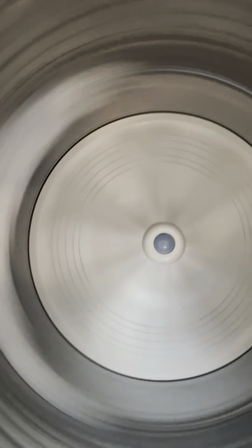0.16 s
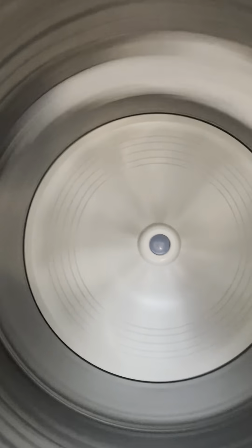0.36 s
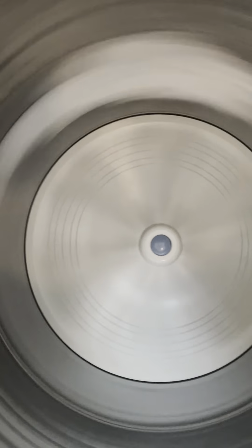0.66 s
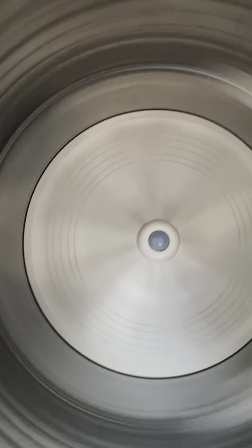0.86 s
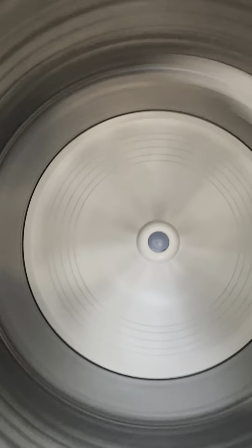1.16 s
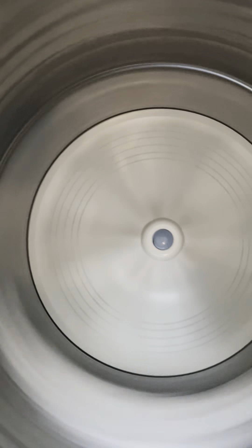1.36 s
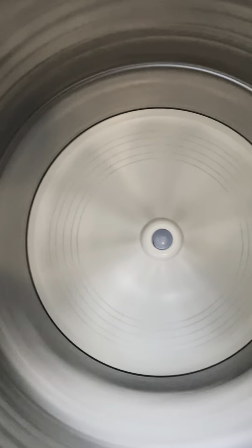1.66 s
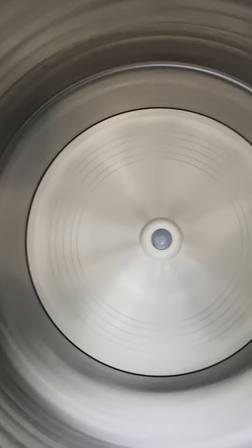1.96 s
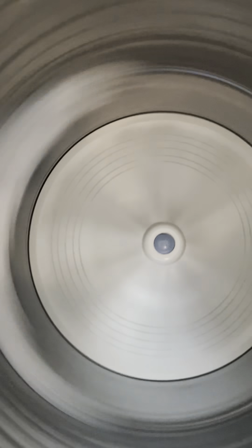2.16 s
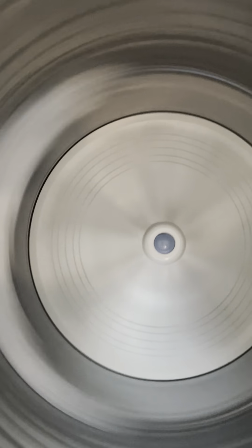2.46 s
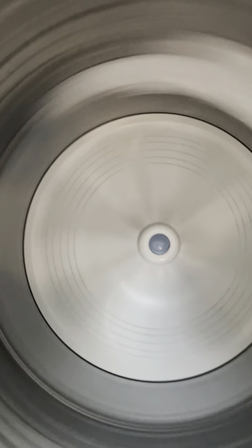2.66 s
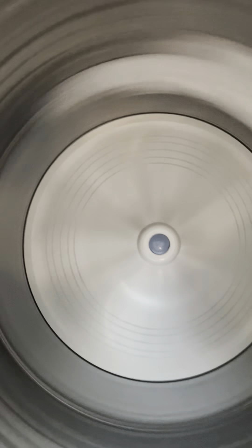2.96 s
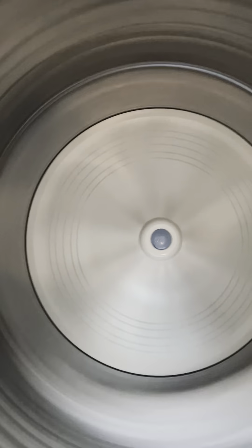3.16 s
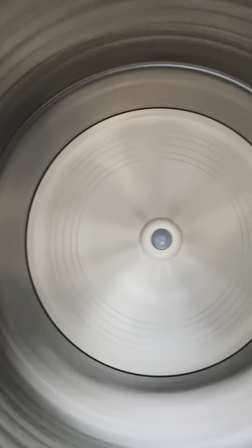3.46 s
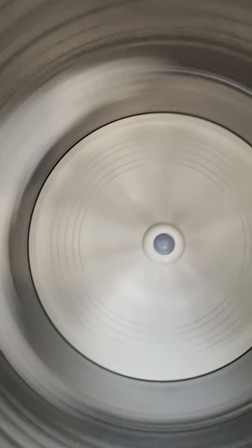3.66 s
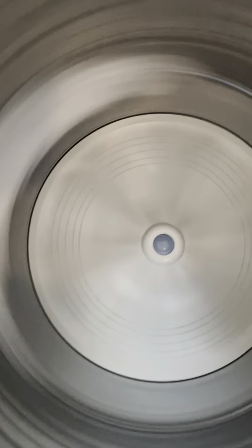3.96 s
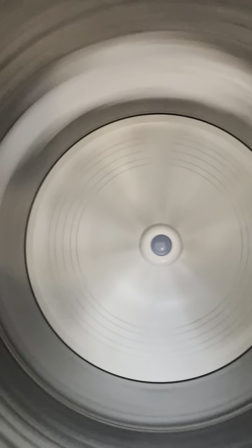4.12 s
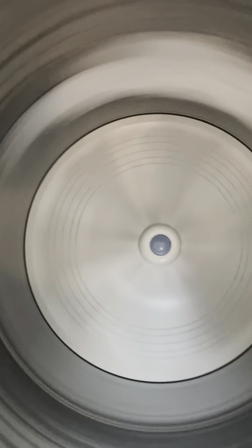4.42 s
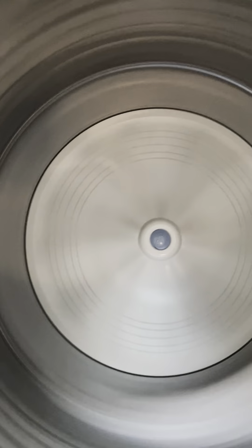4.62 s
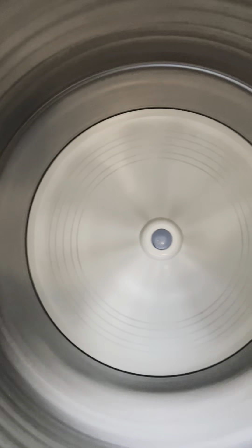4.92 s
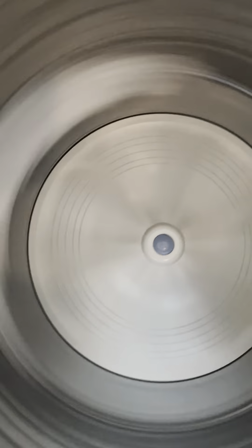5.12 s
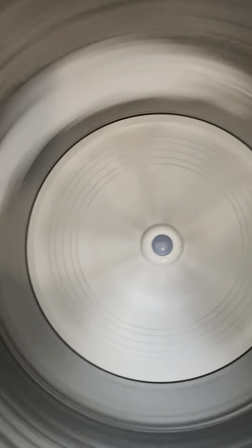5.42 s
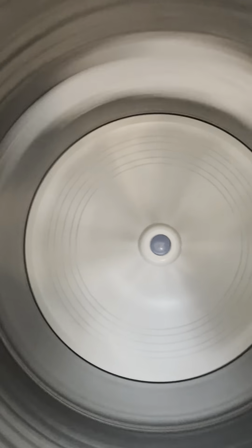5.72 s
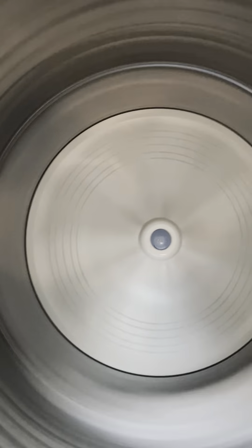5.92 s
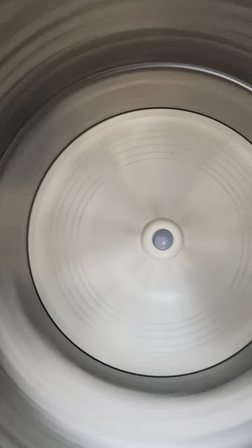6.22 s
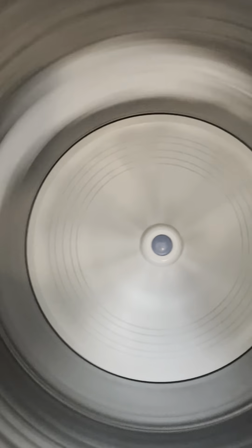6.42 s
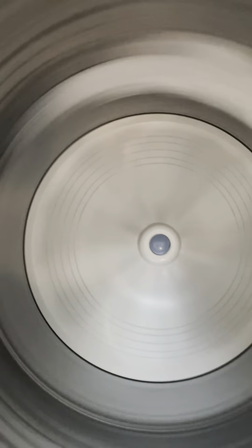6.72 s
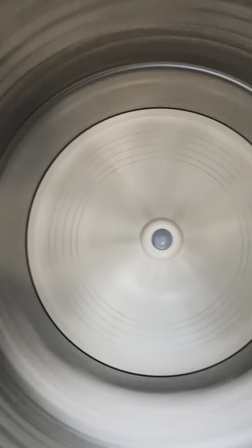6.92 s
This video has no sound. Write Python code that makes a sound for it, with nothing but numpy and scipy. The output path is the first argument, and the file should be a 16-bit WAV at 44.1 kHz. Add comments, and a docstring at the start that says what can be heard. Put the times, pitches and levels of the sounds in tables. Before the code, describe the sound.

A washing machine in its spin cycle, heard from just above the open steel drum indoors. A loud low mains hum dominates, dipping irregularly about twice a second while a deeper shake throbs rapidly underneath. A steady mid-pitched motor whine, uneven tub rumble, metallic whirr and rushing air continue throughout, with occasional dull panel booms and faint high scuffs.

```python
"""A mains hum runs throughout, with a brief thin high hiss at the start: a top-loading washing machine spins,
slowly gaining speed, with the microphone held over its open steel drum. The induction motor hums on
multiples of the mains; in each surge of load the hum sags and a deep shake throbs once per drum turn.
The tub rumbles unevenly, the drive whirrs through drum resonances, and shaped noise makes air rushing past
the perforated wall. Panels rumble and boom as short tones; brief high noise makes the drum's scuffs."""
import sys
import numpy as np
from scipy import signal
from scipy.fft import rfft, irfft, next_fast_len
from scipy.io import wavfile
from scipy.ndimage import uniform_filter1d, map_coordinates

SR = 44100
rng = np.random.default_rng(int(sys.argv[2]) if len(sys.argv) > 2 else 0)


def wav_out(sig):
    """Save sig, one row per channel (or a flat mono array), as 16-bit PCM at SR to the path in sys.argv[1]."""
    wavfile.write(sys.argv[1], SR, np.round(np.clip(np.atleast_2d(sig).T, -1, 1) * 32767).astype(np.int16))


N = 312228
TIME = np.arange(N) / SR  # s
MAINS_HZ = 59.98


def amp(db):
    """Level and amplitude: decibels become a linear gain."""
    return 10 ** (np.asarray(db) / 20)


def unit(x):
    """Normalisation by energy: x scaled to rms 1."""
    return x / np.sqrt(np.mean(np.abs(x) ** 2) + 1e-20)


def along(points, hz):
    """Logarithmic pitch scale: (frequency [Hz], value) points interpolated at hz."""
    f, value = np.transpose(points)
    return np.interp(np.log(hz + 1), np.log(f + 1), value)


def curve(rows):
    """Linear interpolation: (time [s], value) rows as one value per sample."""
    return np.interp(TIME, *np.transpose(rows))


def drift(rate):
    """Slow random modulation: a smooth curve through random knots, rate of them a second."""
    coarse = np.linspace(0, N / SR, N // 64)
    knots = rng.standard_normal(int(N * rate / SR) + 4)
    return np.interp(TIME, coarse, map_coordinates(knots, [coarse * rate]))


def filtered(x, response):
    """Linear filtering: the spectrum of x times a response of frequency."""
    size = next_fast_len(N + SR // 2)
    return irfft(rfft(x, size) * response(np.fft.rfftfreq(size, 1 / SR)), size)[..., :N]


def swell(s, length):
    """Gaussian envelope: a rise to 1 at time s and a fall; length [s] is its half length."""
    out = np.zeros(N)
    near = slice(*np.searchsorted(TIME, [s - np.pi * length, s + np.pi * length]))
    out[near] = np.exp(-((TIME[near] - s) / length) ** 2)
    return out


def swells(rows, lead=0):
    """Level changes add in dB: (time [s], half length [s], change [dB]) rows, lead seconds ahead."""
    return sum(db * swell(s - lead, length) for s, length, db in rows)


def ringing(modes, f):
    """Modal superposition: complex gain at f of (centre [Hz], width [Hz], level [dB]) resonances."""
    gain = 0
    for k, (hz, width, db) in enumerate(modes):
        damping = 1j * f * width
        gain = gain + (-1) ** k * amp(db) * damping / (hz * hz - f * f + damping)
    return gain


def standing_waves(hz, ripple_db, life=0.02):
    """Comb-like interference: decaying echoes in the drum (life [s]) leave a steady ripple in a spectrum."""
    t = np.arange(SR // 10) / SR
    echoes = rng.standard_normal(len(t)) * np.exp(-t / life) * (t > .004)
    ripple = unit(rfft(echoes, SR).real)  # one bin per Hz
    return amp(ripple_db * np.interp(hz, np.arange(len(ripple)), ripple))


# the spaced microphone ports hear the sound at slightly different times:
# (frequency [Hz], phase lead of the left port [rad])
PORT_LEAD = [(130, 0), (260, -.4), (600, -.75), (860, -1.2), (1290, 0), (1750, 0), (2580, 2.6), (3700, 1.7),
             (4500, 1.8), (5000, 1.3), (5900, 3.1), (7700, 6), (10300, 9.4), (12500, 12.5)]
# level difference of the ports: (frequency [Hz], left minus right [dB])
PORT_BALANCE = [(120, 0.5), (480, -1.5), (900, 2), (1400, -1.5), (2000, 0.5), (2800, -1.5), (4600, -3),
                (5800, -1)]


def ports(hz):
    """Differences of level and phase at spaced ports: complex gain of the left and right one."""
    half = np.array([[.5], [-.5]])
    return amp(half * along(PORT_BALANCE, hz)) * np.exp(1j * half * along(PORT_LEAD, hz))


# likeness of the noise at the two ports: (frequency [Hz], likeness [0-1])
PORT_LIKENESS = [(120, 0.97), (250, 0.68), (480, .92), (650, 0.2), (900, .2), (1300, 0.36), (1750, 0.86),
                 (4800, 0.9), (5900, 1), (7200, 1)]


def noise(colour):
    """Partly coherent sound field: noise at both ports, colour(hz) its amplitude per root Hz."""
    hz = np.fft.rfftfreq(next_fast_len(N + SR // 2, real=True), 1 / SR)
    size = 2 * (len(hz) - 1)
    spread = np.arccos(np.clip(along(PORT_LIKENESS, hz), 0, 1)) / 2
    white = rfft(rng.standard_normal((2, N)) * np.sqrt(SR / 2), size)
    common, apart = white * colour(hz) * np.array([np.cos(spread), np.sin(spread)])
    return irfft(np.array([common + apart, common - apart]) * ports(hz), size)[:, :N]


def tone(hz, envelope):
    """Complex phasor: a line at both ports whose envelope holds rms level and phase."""
    angle = 2 * np.pi * (hz * TIME + rng.random())
    return np.sqrt(2) * np.real(ports(hz) * envelope * np.exp(1j * angle))


START_TURN = .35  # the drum's position at the start, turns
# speed of the drum: (time [s], speed [turns per second])
DRUM_SPEED = [(0, 6.415), (7.08, 7.08)]


def drum_turning():
    """Rotation kinematics: the drum's angle [rad] is its speed summed over time."""
    return 2 * np.pi * (START_TURN + np.cumsum(curve(DRUM_SPEED)) / SR)


# surges of load on the motor: (time [s], half length [s], sag of the hum [dB])
LOAD_SURGES = [(0.14, 0.23, 5.5), (0.448, 0.11, 7.5), (0.94, 0.15, 4.5), (1.33, 0.12, 14),
               (1.538, 0.074, 13.5), (1.8, .13, 1), (2.09, 0.16, 14.5), (2.63, 0.15, 6),
               (3.045, 0.14, 18.5), (3.78, 0.25, 3.5), (4.13, 0.07, 3.5), (4.791, 0.12, 13.5),
               (5.19, 0.19, 8.0), (5.563, 0.08, 5), (5.872, 0.085, 12), (6.07, 0.12, 10.5), (6.43, 0.14, 7),
               (6.76, 0.14, 18.5)]


def sag(lead=0):
    """Loading of a motor: the dB that surges take from the hum, lead seconds ahead."""
    return swells(LOAD_SURGES, lead)


def strain():
    """Load about its mean: the sag above its average, in dB."""
    db = sag()
    return db - db.mean()


HUM_DB = -18  # magnetic hum at twice the mains, between surges
# shake at the mains frequency, before its swells: between surges, and added by a full surge
SHAKE_REST_DB, SHAKE_SURGE_DB = -37, -22
SHAKE_LEAD_S = 0.026  # the shake comes this much before the sag of the hum
# the deep shake swells and ebbs: (time [s], half length [s], change [dB])
SHAKE_CHANGES = [(.94, .045, -15), (1.56, 0.028, -10), (3.02, .04, 0), (3.08, 0.03, -3), (3.5, .07, -12),
                 (4.0, 0.075, -13), (4.22, .1, 3.5), (4.42, 0.06, -6), (5.3, .15, 0.5), (5.68, .1, 3),
                 (6.15, .2, 2.5)]


def motor(drum_angle, beat_db=-47, beat_share=0.23, beat_lead=0.17, flutter=0.074, slip=0.46, steepness=1.11):
    """Magnetic hum and beating: surges shift the hum's phase; an off-centre drum beats the shake each turn."""
    lost_share = np.clip(1 - amp(-sag(SHAKE_LEAD_S)), 0, 1)
    shake = amp(SHAKE_REST_DB) + amp(SHAKE_SURGE_DB) * lost_share ** steepness
    # a line one drum speed above the mains beats with the shake; beat_lead and slip are in radians
    beat = (amp(beat_db) + beat_share * shake) * np.exp(1j * (drum_angle + beat_lead))
    unsteady = 1 + flutter * (drift(24) + 1j * drift(7.8))
    hum = amp(HUM_DB - sag()) * np.exp(1j * slip * lost_share) * unsteady
    deep = tone(MAINS_HZ, amp(swells(SHAKE_CHANGES)) * (shake + beat))
    return deep + tone(2 * MAINS_HZ, hum)


def hiss(hiss_db=-84, fade=0.089):
    """Exponential decay: a thin high hiss dies away in the first moments; fade [s] is its time constant."""
    # (frequency [Hz], density relative to hiss_db [dB])
    colour = [(4000, -34), (7500, -0.5), (9000, 3.0), (13000, -13), (14500, -28.5)]
    return amp(hiss_db) * np.exp(-TIME / fade) * noise(lambda hz: amp(along(colour, hz)))


THROB_TURN = 0.67  # point of each drum turn at which the upper tones peak, turns


def throb(drum_angle, depth):
    """Amplitude modulation: a gain of rms 1 that peaks once per drum turn."""
    return unit(1 + depth * np.cos(drum_angle - 2 * np.pi * THROB_TURN))


# overtones of the hum: (multiple of the mains, level at mean load [dB], unsteadiness [0-1],
# gain per dB of sag [dB], depth of the throb [0-1])
HUM_OVERTONES = [(3, -43, 0.5, 0.3, 0.4), (4, -33, 0.05, -0.05, 0.36), (5, -41, 0.4, -0.12, 0.2),
                 (6, -50, 0.6, -1.3, 0), (7, -42, 0.17, 0.02, 0.28), (10, -53, 0.55, -0.2, 0.02),
                 (15, -64, 0.4, -0.54, 0), (16, -66, 0.4, -1.1, 0.4)]
# single overtones sing out or fade: (multiple of the mains, time [s], half length [s], change [dB])
OVERTONE_SWELLS = [(5, 2.98, 0.15, 10), (5, 4.5, 0.054, 3.5), (5, 4.2, 0.074, 3.5), (5, 4.4, .22, 6),
                   (5, 5.3, .14, 5), (6, 5.5, .25, 9), (7, 0.33, .3, 3), (7, 1.56, 0.2, 7),
                   (7, 2.17, .11, 7), (7, 2.6, .11, 6), (7, 3.65, 0.31, -4), (7, 6.05, 0.073, 8),
                   (7, 6.88, .07, 5)]


def overtones(drum_angle, strain_db):
    """Harmonic series: upper lines waver and throb, load lifts or lowers each, and some sing out or fade."""
    out = np.zeros((2, N))
    for multiple, db, unsteady, grows, depth in HUM_OVERTONES:
        wandering = unit(drift(12) + 1j * drift(12))
        waver = np.sqrt(1 - unsteady ** 2) + unsteady * wandering
        singing_db = swells([row[1:] for row in OVERTONE_SWELLS if row[0] == multiple])
        level = amp(db + grows * strain_db + singing_db)
        out += tone(multiple * MAINS_HZ, level * waver * throb(drum_angle, depth))
    return out


WHINE_ORDER = 8  # multiple of the mains
# the motor's whine: (time [s], level before trim_db and throb [dB])
WHINE_LEVEL = [(0.15, -37), (0.4, -42), (0.62, -38), (1.1, -33), (1.5, -41), (1.75, -35.5), (1.95, -39),
               (2.35, -32.5), (2.8, -36.5), (3.7, -35.5), (4.1, -38), (4.6, -33), (4.8, -41), (4.98, -35),
               (5.27, -44), (5.6, -34.5), (5.8, -34), (6.08, -38.5), (6.3, -33.5), (6.52, -39),
               (6.8, -34.5), (7.0, -41.5)]


def whine(drum_angle, depth=.22, trim_db=-0.45):
    """A modulated harmonic: the motor's firm upper tone throbs with the drum and now and then fades."""
    level = amp(trim_db + curve(WHINE_LEVEL))
    return tone(WHINE_ORDER * MAINS_HZ, level * throb(drum_angle, depth))


# wobble of the drum: (multiple of its speed, rms level [dB])
DRUM_ORDERS = [(5, -59), (6, -55.5), (7, -55), (13, -49)]
# colour of the tub's rumble before jolts and ripple: (frequency [Hz], density [dB per Hz])
TUB_COLOUR = [(20, -90), (45, -73.5), (64, -48), (78, -56.5), (100, -60), (135, -58), (152, -52.5),
              (170, -59.5), (200, -59), (250, -57), (385, -61), (447, -64.5), (490, -59.5), (550, -69.5),
              (640, -72.5), (1500, -150)]


def tub(drum_angle, jolt_db=1, turn_db=0.86, ripple_db=1):
    """Random vibration plus rotational orders: the tub jostles on its springs over the drum's low orders."""
    jolts = amp(jolt_db * drift(15) + turn_db * np.cos(drum_angle))
    rumble = jolts * noise(lambda hz: amp(along(TUB_COLOUR, hz)) * standing_waves(hz, ripple_db))
    orders = 0
    for multiple, db in DRUM_ORDERS:
        orders = orders + amp(db) * np.sin(multiple * drum_angle + 2 * np.pi * rng.random())
    return rumble + np.sqrt(2) * orders


# resonances of the steel drum, before the soft roll-off: (centre [Hz], width [Hz], density [dB per Hz])
DRUM_MODES = [(1137, 14, -71), (1204, 17, -66), (1261.6, 16, -62), (1327, 50, -68.5), (1414, 33, -66),
              (1483, 22, -69.5), (2179, 15, -72.5), (2296, 40, -73), (2768, 85, -68), (2990, 21, -75.5),
              (3606, 52, -79), (4500, 150, -81.5), (4960, 40, -78.5), (5400, 48, -79)]
# the drive's own resonances, before the roll-off: (centre [Hz], width [Hz], density [dB per Hz])
DRIVE_MODES = [(1646, 50, -73), (1692, 36, -69.5), (1800, 67, -76)]
# the drive rubs harder for a moment: (time [s], half length [s], rise [dB])
DRIVE_RUBS = [(1.5, 0.057, 5), (2.96, .09, 7.5), (4.75, .06, 5), (6.58, .14, 4)]


def whirr(buzz=0.16, waver_db=1.04, soft_hz=5500, drive_waver_db=1.5):
    """Forced resonance: drive friction, pulsing with the motor's torque, rings steel drum and drive."""
    torque = unit(1 + buzz * np.cos(2 * np.pi * 2 * MAINS_HZ * TIME))

    def soft(hz):
        """Low-pass roll-off about soft_hz."""
        return 1 / (1 + (hz / soft_hz) ** 10)

    steel = noise(lambda hz: ringing(DRUM_MODES, hz) * soft(hz)) * amp(waver_db * drift(21))
    rubbing = amp(swells(DRIVE_RUBS) + drive_waver_db * drift(9))
    drive = noise(lambda hz: ringing(DRIVE_MODES, hz) * soft(hz)) * rubbing
    return (steel + drive) * torque


# colour of the rushing air before ripple and eddies: (frequency [Hz], density [dB per Hz])
AIR_COLOUR = [(300, -84.5), (620, -72.5), (900, -75.5), (1500, -72.5), (1950, -75.5), (2400, -70.5),
              (3050, -71.5), (3400, -80.5), (4400, -79), (4900, -85), (6200, -85.5), (7100, -99),
              (9300, -102), (15000, -122)]


def air(drum_angle, turn_db=0.4, patchy_db=1.36, ripple_db=2.0):
    """Turbulence noise: air swirls past the drum wall in eddies, a little stronger once a turn."""
    rush = noise(lambda hz: amp(along(AIR_COLOUR, hz)) * standing_waves(hz, ripple_db))
    bands = signal.stft(rush, nperseg=512)[2]
    # random patches, smoothed across frequency and then time
    eddies = uniform_filter1d(rng.standard_normal(bands.shape[1:]), size=12, axis=0)
    eddies = uniform_filter1d(eddies, size=16, axis=1)
    swirl = signal.istft(bands * amp(patchy_db * unit(eddies)), nperseg=512)[1][:, :N]
    return amp(turn_db * np.cos(drum_angle)) * swirl


WHIRR_GROWS = 0.046  # dB gained by the whirr for each dB of sag
# brief swells and lulls of the whirr and the air: (time [s], half length [s], change [dB])
WASH_CHANGES = [(2.02, 0.033, -1.5), (2.45, 0.064, 1), (3.5, 0.69, -0.74), (4.77, 0.065, 0.2),
                (5.055, 0.028, -4)]


def wash(drum_angle, strain_db):
    """Superposition of broadband sources: whirr, raised by load, and air swell and lull together."""
    loaded_whirr = amp(WHIRR_GROWS * strain_db) * whirr()
    return amp(swells(WASH_CHANGES)) * (loaded_whirr + air(drum_angle))


BOOM_S, PANEL_DB = 0.025, -34  # half length of a boom in s; panel rumble before its swells
# colour of the panels' rumble: (frequency [Hz], relative density [dB])
PANEL_COLOUR = [(100, -120), (215, -20.5), (250, -4.5), (275, 1), (295, 1.5), (320, -5.5), (345, -4),
                (380, -14), (700, -120)]
# the panels' rumble swells and ebbs: (time [s], half length [s], change [dB])
PANEL_CHANGES = [(.2, .3, 1.5), (1.9, 0.44, 2.5), (3.99, 0.16, -15), (6.75, 0.16, -4.5)]
# the loudest booms of the cabinet panels: (time [s], peak level before trim_db [dB], frequency [Hz])
PANEL_BOOMS = [(0.585, -28, 292), (0.86, -23, 297), (1.211, -26.5, 290.5), (1.7, -25.5, 276),
               (1.932, -24, 285), (2.027, -26, 264.7), (2.18, -19.5, 300.3), (3.075, -25.5, 294.7),
               (3.673, -26, 302.5), (4.918, -26, 275.5), (5.065, -23.5, 231), (5.425, -27, 297),
               (5.656, -26, 295), (6.007, -28, 280), (6.095, -23, 291.5), (6.207, -26, 293.5),
               (7.017, -24.5, 298)]


def panels(trim_db=-3.0, jolt_db=2.5):
    """Plate modes: the cabinet's sheet metal rumbles unevenly, and now and then one mode booms."""
    rumble = unit(amp(jolt_db * drift(25)) * noise(lambda hz: amp(along(PANEL_COLOUR, hz))))
    booms = sum(tone(hz, amp(db + trim_db) * swell(s, BOOM_S)) for s, db, hz in PANEL_BOOMS)
    return amp(PANEL_DB + swells(PANEL_CHANGES)) * rumble + booms


# brief scuffs of the turning drum: (time [s], peak level [dB], centre frequency [Hz])
DRUM_SCUFFS = [(0.67, -45, 4480), (0.78, -47, 4500), (1.0, -43.5, 4400), (2.41, -48, 4500),
               (2.96, -46, 4600), (4.43, -45, 4960)]


def scuffs(length=0.026, width_hz=380):
    """Friction noise in a narrow band: the drum now and then brushes something, a soft, high swish."""
    out = 0
    for s, db, centre in DRUM_SCUFFS:
        swish = unit(noise(lambda hz: np.exp(-((hz - centre) / width_hz) ** 2)))
        out = out + amp(db) * swell(s, length) * swish
    return out


def scene():
    """Superposition: the parts add, sharing the turning of the drum and the load on the motor."""
    drum_angle = drum_turning()
    strain_db = strain()
    hum = motor(drum_angle) + overtones(drum_angle, strain_db) + whine(drum_angle)
    return hum + hiss() + tub(drum_angle) + wash(drum_angle, strain_db) + panels() + scuffs()


TOP_HZ = 15700  # band limit


def record(dry):
    """Band limitation: a short fade-in avoids a click, and nothing above the band limit is kept."""
    opening = np.clip(TIME / .004, 0, 1)
    return filtered(dry * opening, lambda hz: hz < TOP_HZ)


dry = scene()
out = record(dry)
wav_out(out)
```